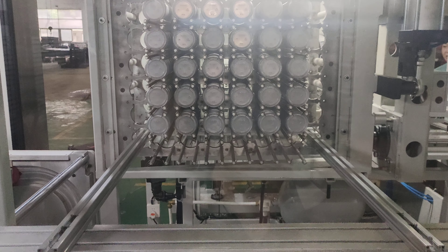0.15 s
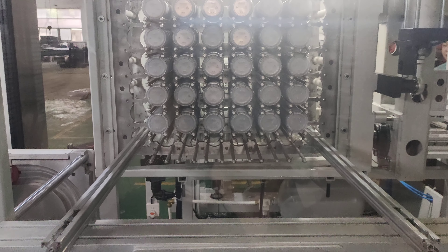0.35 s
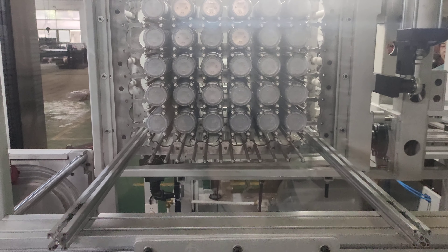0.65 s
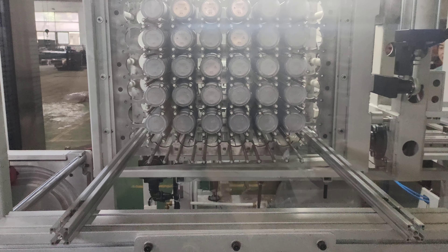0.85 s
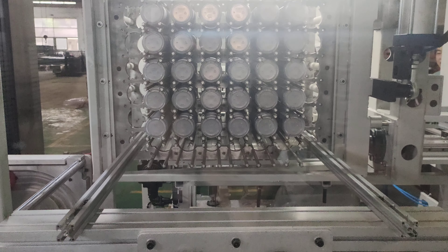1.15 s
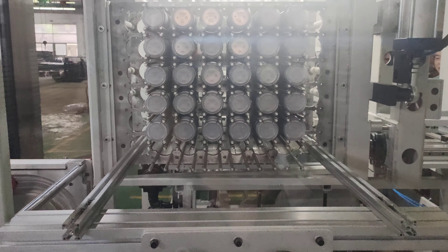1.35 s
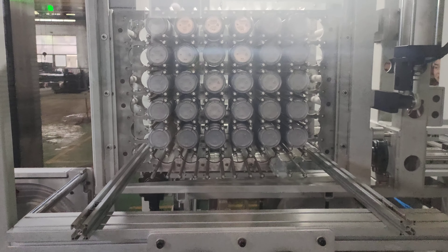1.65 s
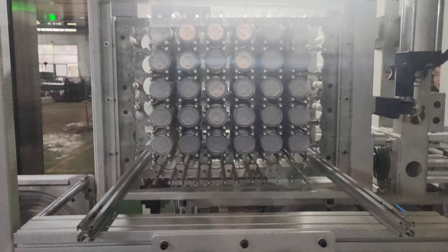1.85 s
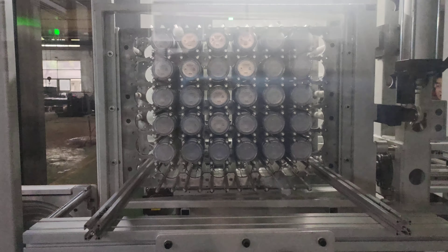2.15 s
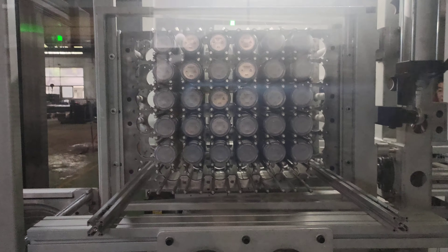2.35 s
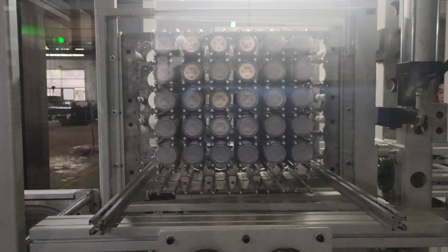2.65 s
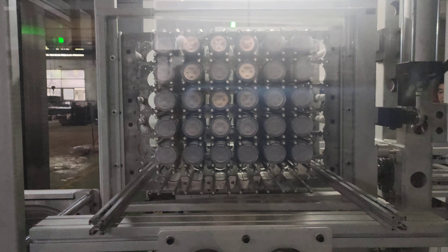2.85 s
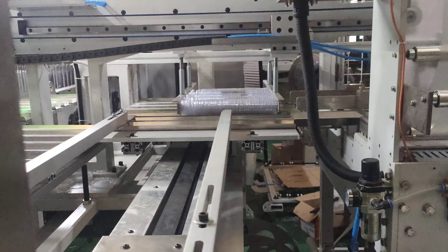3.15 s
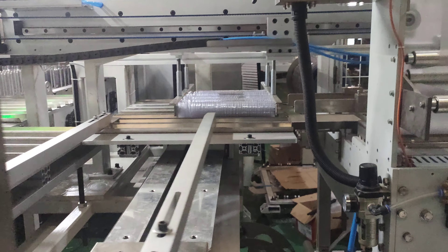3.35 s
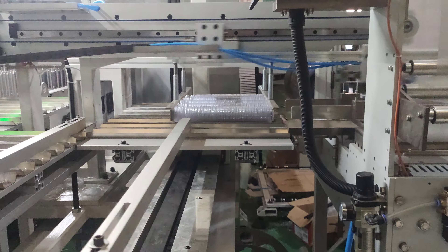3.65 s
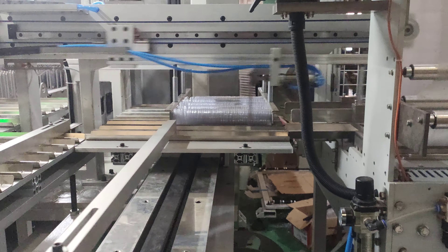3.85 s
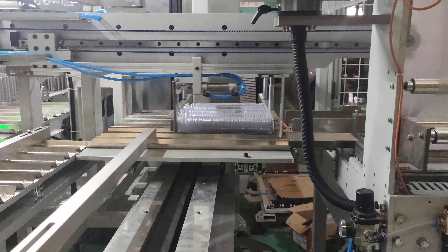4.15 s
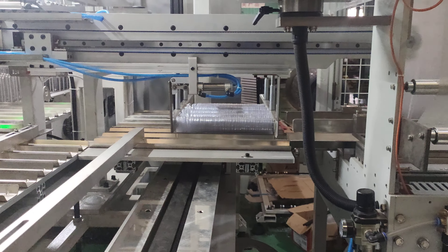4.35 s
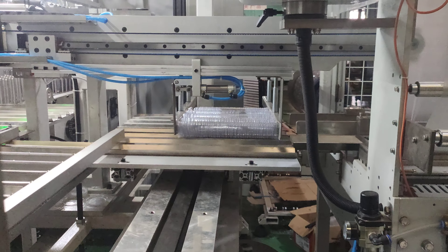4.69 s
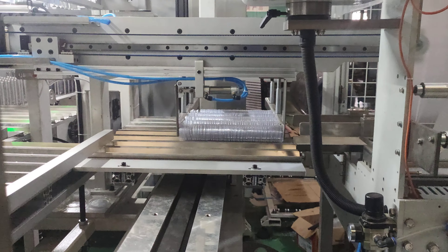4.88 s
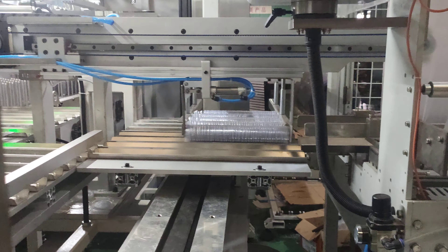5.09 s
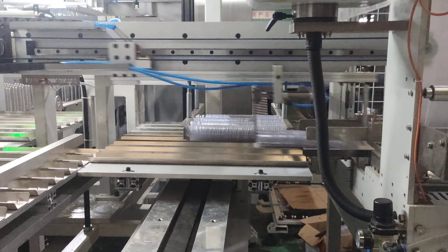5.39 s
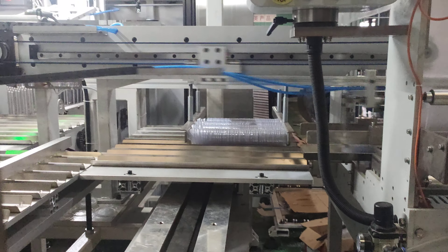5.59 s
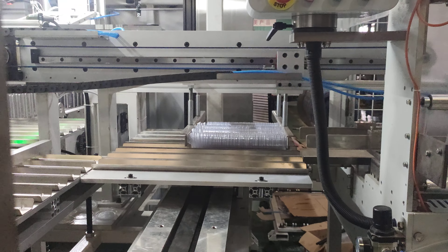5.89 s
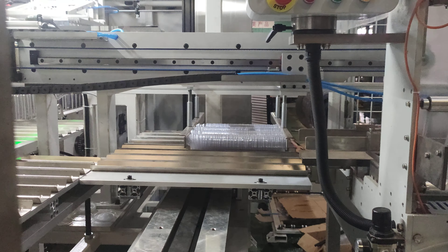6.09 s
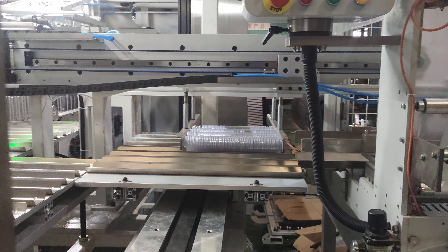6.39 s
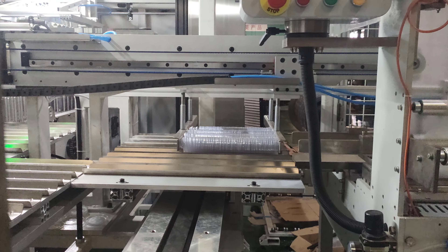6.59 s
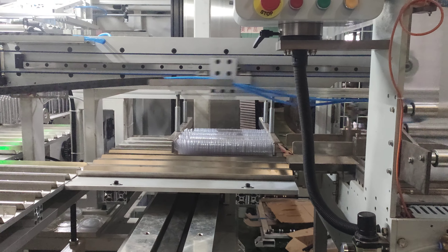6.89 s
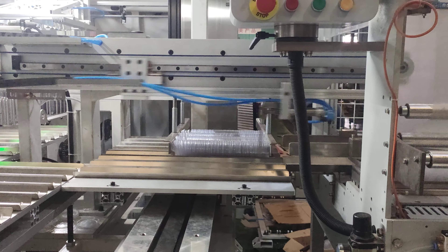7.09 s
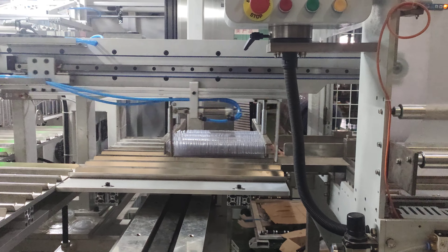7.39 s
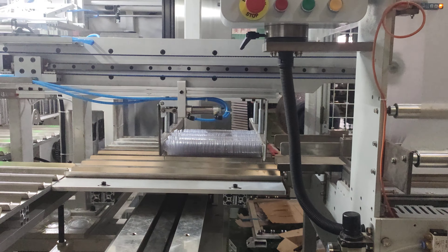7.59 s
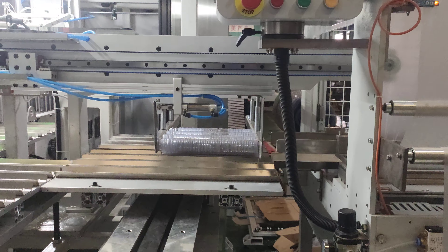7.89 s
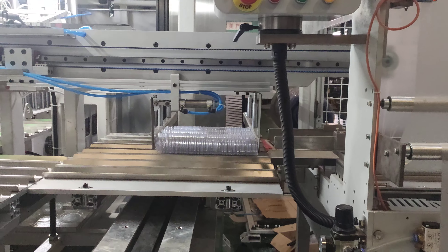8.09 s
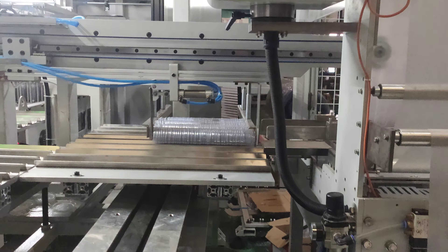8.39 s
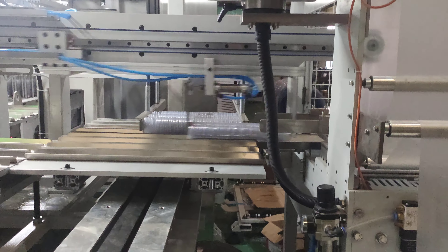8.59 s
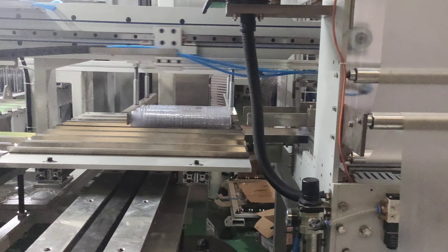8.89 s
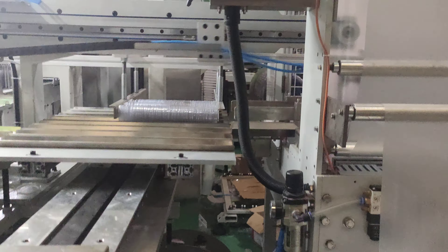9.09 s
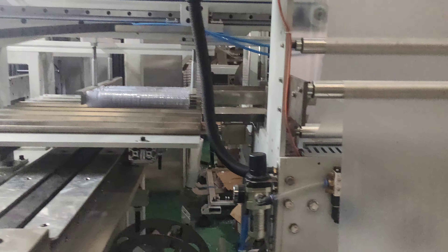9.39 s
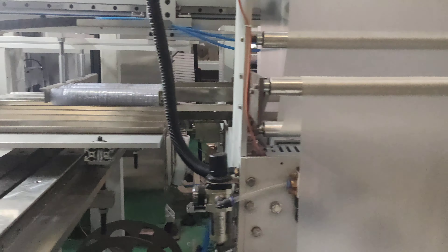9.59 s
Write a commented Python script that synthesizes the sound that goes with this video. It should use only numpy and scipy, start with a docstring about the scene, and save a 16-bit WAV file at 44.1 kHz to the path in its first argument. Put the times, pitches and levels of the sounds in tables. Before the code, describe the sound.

Factory forming and stacking machines drone, with repeated bursts of air hiss, metal clanks and rattling plastic cups, briefly cutting out.

```python
"""A forming mould drones and vents air in a factory hall, then slams shut with a blast that pops the left
microphone port. After half a second of silence this plastic thermoforming line is heard at its stacker.
The press works in a 2.2 s cycle: it vents air, slides, drops rattling cups and thumps its frame.
The stacker's carriage keeps its own 3.3 s cycle of hissing valves and slides knocking on their stops.
Underneath, the conveyor and the hall drone on."""
import sys
import numpy as np
from scipy import signal
from scipy.fft import rfft, irfft, next_fast_len
from scipy.io import wavfile
from scipy.ndimage import uniform_filter1d, map_coordinates

SR = 44100
rng = np.random.default_rng(int(sys.argv[2]) if len(sys.argv) > 2 else 0)


def wrap_up_sound(samples):
    """Save the sound to the file named by the first command line argument, as 16-bit audio."""
    columns = np.atleast_2d(samples).T
    # keep every value between -1 and 1, then stretch to whole-number steps
    tamed = np.clip(columns, -1, 1)
    steps = np.round(tamed * 32767).astype(np.int16)
    wavfile.write(sys.argv[1], SR, steps)


N = 429534
T = np.arange(N) / SR
SILENCE_START_S, SILENCE_END_S = 2.521, 3.008
POP_S, PRESSURE_RISE_S, CHOKE_ONSET_S = .0024, .0046, .014
MODE_SPREAD = .022  # share by which a body's pitches vary from blow to blow
TOP_HZ = 11700

# starts of the mould, press and carriage cycles: t/s, level/dB
CYCLES = {"mould": [(-0.624, 0), (1.557, -1.4)], "press": [(3.366, 0.4), (5.571, 0.5), (7.78, -0.6)],
          "carriage": [(3.064, 1.7), (6.363, 0.93), (9.65, 1.2)]}
# The next seven cue lists count from the start of the named cycle; "once" rows are in scene time.
# strokes of the mould's platens and sheet feed: t/s at full speed, level/dB, half length/s
PLATEN_STROKES = {"mould": [(.28, -19.5, .13), (.675, -20, 0.15), (1.08, -30, 0.11), (1.53, -34, 0.033),
                  (1.73, -18, 0.11), (2.03, -25, 0.077), (2.22, -24.5, 0.034)]}
# strokes of the slides along their rails: t/s at full speed, level/dB, half length/s
SLIDE_STROKES = {"press": [(-.005, -23, 0.026), (.25, -21, 0.17), (.64, -26, 0.13), (1.1, -35.5, .1),
                 (1.73, -25, .11)], "carriage": [(.1, -30.5, 0.18), (1.38, -27.5, 0.091),
                 (2.62, -28.5, 0.042)]}
# air venting from the mould: t/s, level/dB, open/s, pressure fall/(dB/s), t60/s after closing
VENTS = {"mould": [(.19, -16, 0.48, 18, 1.43), (1.99, -35, .03, 10, .6), (2.14, -24.5, .04, 0.5, .25),
         (2.19, -21, 0.026, 6, .25)]}
# valve exhausts: t/s, level/dB, open/s, pressure fall/(dB/s), t60/s after closing, sizzle/dB re hiss
VALVES = {"press": [(-.018, -28, 0.026, 3.5, 0.35, -3), (.003, -21, 0.23, 19, 0.46, -2.5),
          (.41, -26, .16, 21, .6, -24)], "carriage": [(-.004, -21, 0.32, 7, 0.53, -10),
          (.92, -21, 0.31, 3, 0.36, -9), (1.912, -28, 0.17, 20, .55, -19),
          (2.309, -28, 0.01, 20, 0.15, -5)], "once": [(1.626, -19, 0.012, 24, 0.39, -0.5),
          (2.031, -14.5, 0.012, 39.5, 0.3, -8), (8.98, -29, 0.19, 18, 0.71, -10)]}
# cups being pushed and stacked: t/s, level/dB, hold/s, fall/(dB/s), boom/dB re ring
CUP_PUSHES = {"press": [(.004, -19.5, 0.142, 27.5, -4.5)], "carriage": [(1.201, -18, 0.056, 41.5, -10),
              (2.785, -30.5, 0.045, 30, 0)], "once": [(3.47, -24.5, .12, 9, -2.5)]}
# slides hitting their stops: t/s, level/dB, t60/s, click/dB re clank
STOPS = {"carriage": [(.016, -26.5, .2, -9.5), (1.202, -17, 0.5, -19), (2.309, -26.5, .16, 1),
         (2.772, -17.5, 0.34, -16)], "once": [(1.584, -24.5, .1, -1), (1.606, -19.5, 0.12, 3),
         (1.728, -24, 0.2, 5.5), (3.34, -23.5, .3, -12), (4.33, -17, 0.126, -15), (5.84, -21, .2, -3),
         (6.21, -26, 0.57, -18.5), (7.625, -15.5, 0.16, -17), (7.765, -23, .25, -12),
         (8.91, -23, 0.45, -18), (9.130, -31, 0.25, 2), (9.157, -20.5, .25, -20), (9.653, -23, .1, -13)]}
# heavy strokes shaking the frame: t/s, level/dB
THUMPS = {"press": [(.11, -16.5), (.41, -17)], "once": [(2.04, -11.5), (4.3, -23.5)]}

# single hits: t/s, level/dB
CUP_CLACKS = [(1.586, -20.5), (1.641, -17), (3.381, -15.5), (3.425, -16), (3.444, -16.5), (3.487, -17.5),
              (3.527, -20.5), (4.272, -15.5), (4.302, -21), (5.577, -19), (5.595, -15), (5.634, -14),
              (5.655, -17), (5.679, -18), (7.575, -16), (7.599, -21), (7.624, -22), (7.793, -13),
              (7.838, -16), (7.862, -18.5), (7.895, -21), (7.922, -15.5), (9.180, -18)]
STEEL_CLINKS = [(1.603, -25), (1.619, -20), (1.729, -18), (1.740, -15.5), (2.039, -24)]
SPOOL_KNOCKS = [(4.975, -21), (5.378, -19), (6.379, -13.5), (8.676, -21.5), (8.985, -15), (9.668, -16)]
# squeals and groans of air and guides: t/s, half length/s, f/Hz, width/Hz, glide/(Hz/s), level/dB
SQUEALS = [(0.345, 0.016, 403, 110, 0, -23.5), (0.42, 0.026, 785, 220, -1500, -23.5),
           (1.829, 0.055, 1680, 190, 0, -19.5), (1.951, 0.09, 1690, 260, 0, -23),
           (1.901, 0.047, 2800, 600, 2500, -21.5), (1.931, 0.12, 2110, 190, 2, -27),
           (2.014, 0.022, 4910, 400, 12000, -25), (2.2, 0.2, 333, 160, 0, -31),
           (1.812, .016, 6900, 380, 0, -26.5), (1.885, .025, 5400, 300, -0.5, -26),
           (2.062, .04, 7640, 260, 0.5, -23), (5.997, 0.12, 2120, 260, 2.5, -30),
           (7.668, 0.01, 291, 60, -3, -20), (8.918, 0.008, 5460, 1110, 0, -29),
           (9.57, 0.077, 356, 130, -1, -29.5), (9.703, .04, 2750, 450, -6, -26.5)]
# air puffs on the left port: t/s, level/dB, half length/s
PUFFS = [(1.633, -15, 0.008), (1.848, -21, .012)]
# pops of the left diaphragm as the mould closes: t/s, level/dB, polarity, pressure before it/dB re pop
POPS = [(1.640, -1, 1, -1), (1.655, -1, -1, -11.5), (1.690, -2.5, -1, -12), (1.730, -4, 1, -11)]
# the overloaded left port goes deaf: t/s at its deepest, depth/dB, recovery/s
CHOKES = [(1.670, 28.5, .03), (1.739, 26, 0.055)]
# fader curve of the conveyor and hall drone at the stacker: t/s, level/dB
CONVEYOR_LEVEL = [(3, -28), (4.8, -28), (5.3, -26.5), (6.4, -28), (7, -25.5), (8.8, -28), (9.74, -25)]

# narrow resonances: f/Hz, width/Hz, level/dB
MOULD_WHINE = [(1030, 105, -35), (2150, 60, -49.5)]
DRIVE_WHIRR = [(273, 70, -35), (2096, 170, -34.5), (3135, 430, -32.5), (3476, 61, -40.5)]
CUP_RING = [(805, 100, -3.5), (955, 160, -6)]  # relative to the rattle
SILENCER_PEAKS = [(3250, 300, 2), (5040, 650, 3), (6960, 200, 4.5), (7550, 180, 4.5), (8200, 300, 4),
                  (11040, 1200, 8.5)]  # boosts on the valves' hiss
# what struck bodies ring with: f/Hz, level/dB, t60/s
CUP_MODES = [(228.5, -8.5, 0.13), (338, -5.5, 0.15), (491, -10, 0.078), (684, -8.5, 0.072),
             (829, -2.5, 0.15), (940, -3, 0.11), (1054, -7.5, 0.1), (1270, -9, .05)]
STEEL_MODES = [(1712, -5, .07), (1950, -5, .05), (2130, -3.5, .12), (2347, 1, .08), (2568, -3.5, .06),
               (3456, -13.5, .05)]
FRAME_MODES = [(82.9, -0.5, 0.24), (96, -4, 0.22), (113, -1.5, .2), (205, -10, .12)]
VALVE_BLOCK_MODES = [(327, -9.5, 0.05), (847, -6.5, 0.052), (1104, -5, 0.045), (1730, -4.5, .028)]
# noise colours: f/Hz, level/dB
MOULD_DRONE = [(25, -33), (60, -15.5), (110, -1.5), (170, -0.5), (230, 2), (320, -3), (480, -3),
               (600, -4.5), (1000, -6.5), (2000, -9), (4000, -37), (12000, -37)]
STACKER_DRONE = [(25, -51), (55, -17), (100, -3.5), (170, 0), (270, -0.5), (380, -2), (550, -4.5),
                 (900, -3.5), (2000, -14.5), (4000, -38), (12000, -70)]
SCRAPE = [(100, -17), (400, -5.5), (800, -5), (1300, 0.5), (2100, 1), (2600, -3), (3100, -11.5),
          (3900, -19.5), (6000, -17.5), (12000, -42.5)]
VENT_HISS = [(500, -30), (2000, -6), (3000, 2.5), (4000, -9.5), (5400, 0), (6800, 0), (8200, -1),
             (9600, -15), (11500, -16)]
EXHAUST_HISS = [(300, -4.5), (1000, -10), (2000, -0.5), (3200, -3.5), (4100, -6), (5200, -5), (6400, -1),
                (7500, 2), (8400, -1.5), (9800, -13.5), (11300, -14)]
JET_SIZZLE = [(4000, -18.5), (5300, 1), (7000, -5.5), (8900, 10.5), (9900, -0.5), (10700, 8.5),
              (11600, -0.5)]
CUP_RATTLE = [(300, -22), (500, -7.5), (690, -2.5), (800, -4), (950, 0), (1100, -1.5), (1300, -6),
              (2100, -11), (3800, -39), (10000, -39.5)]
STACK_BOOM = [(60, -16.5), (150, -4), (225, 0.5), (290, 0), (350, 0), (450, -5.5), (700, -24), (2000, -60)]
CLANK = [(200, -1), (500, -2), (1000, 0), (1700, -0.5), (2500, -2), (3300, -6), (4000, -16), (7000, -13),
         (12000, -39.5)]
AIR_BUFFET = [(20, -5), (60, 2.5), (130, 0), (400, -6), (1500, -20), (6000, -40), (11000, -30)]
# stereo likeness of the two ports: f/Hz, correlation (capped at 1 in use)
PORT_LIKENESS = [(80, -0.5), (150, 1.1), (350, 0.85), (800, 0.42), (1100, 0.12), (1500, -0.33),
                 (2200, 0.03), (4000, 0), (9000, 0.02)]
# tone of each port: f/Hz, level/dB
LEFT_EQ = [(80, -2), (160, 1.5), (250, 1.3), (900, 1.03), (2200, -2.5), (5000, -1), (7500, 0.5),
           (11000, -2.5)]
RIGHT_EQ = [(50, -16), (90, -22.5), (125, -21), (165, -4), (250, 0.9), (900, 1.17), (2200, 1.5),
            (5000, 2.5), (7500, 5), (11000, -1.5)]


def mould():
    """The forming station: platens rumble, scrape and spill air; vents hiss over whine and motor hum."""
    moving = motion(PLATEN_STROKES)
    drone = np.hypot(amp(-27), amp(-6) * moving) * rush(MOULD_DRONE) * rattle(rate=410, t60=.37)
    scrape = np.hypot(amp(-32), moving) * rush(SCRAPE) * rattle(rate=1300, t60=.11)
    vent_power = sum((amp(db) * burst(s, hold, fall, t60, rise=.024)) ** 2
                     for s, db, hold, fall, t60 in cues(VENTS))
    air = np.sqrt(vent_power + (amp(-12) * moving) ** 2 + amp(-41.5) ** 2) * rush(VENT_HISS)
    whine = sum(amp(db + 2.5 * wobble(6)) * tone(hz, width) for hz, width, db in MOULD_WHINE)
    return drone + scrape + air + whine + motor(hum_hz=167.4, db=-35)


def stacker():
    """The stacking station: a rumbling conveyor, air-driven slides and a drive whose whirr drops back."""
    moving = motion(SLIDE_STROKES)
    conveyor = amp(np.interp(T, *np.transpose(CONVEYOR_LEVEL)))
    drone = np.hypot(conveyor, amp(-6.5) * moving) * rush(STACKER_DRONE) * rattle(rate=450, t60=.43)
    running = np.interp(T, [6.4, 7], [1, .25])
    sliding = np.hypot(amp(-30) * np.hypot(1, amp(-1.5) * running), amp(-1.5) * moving)
    scrape = sliding * rush(SCRAPE) * rattle(rate=860, t60=.42)
    leak = amp(-5.5) * sliding * rush(EXHAUST_HISS)  # the harder the slides run, the more air they spill
    whirr = running * sum(amp(db + 1.8 * wobble(7)) * tone(hz, width) for hz, width, db in DRIVE_WHIRR)
    return drone + scrape + leak + whirr


def valves():
    """Each valve spits as it opens, then hisses while the pressure falls; its sizzle dies first."""
    out = np.zeros((2, N + SR))
    for s, db, hold, fall, t60, sizzle_db in cues(VALVES):
        spit = amp(-1) * burst(0, .012, 0, t60 / 2, rise=.01, size=SR)
        flow = np.hypot(burst(0, hold, fall, t60, rise=.0026, size=SR), spit)
        sizzle = amp(sizzle_db) * flow ** 2 * rush(JET_SIZZLE, SR)
        place(out, s, amp(db) * (flow * jet(SR, echo_db=-11.5) + sizzle))
    return out[:, :N] * amp(.6 * wobble(45)) * rattle(rate=2200, t60=.04)  # flutter and sputter


def jet(size, echo_db):
    """Hiss through a silencer; echoes off the nearest panels comb it differently for each valve."""
    lags_s = rng.uniform(.0004, .005, (3, 1))

    def gain(hz):
        boost_db = sum(db * bell(hz - centre, width / 2) for centre, width, db in SILENCER_PEAKS)
        comb = 1 + amp(echo_db) * np.cos(2 * np.pi * hz * lags_s).sum(0)
        return colour(EXHAUST_HISS, hz) * amp(boost_db) * comb
    return diffuse(gain, size)


def cups():
    """Thin cups strike one another in a quick hollow rattle, and their stack booms."""
    ring_power, boom_power = np.zeros((2, N))
    for s, db, hold, fall, boom_db in cues(CUP_PUSHES):
        push = amp(db) * burst(s, hold, fall, t60=.45, rise=.0067)
        ring_power += push ** 2
        boom_power += (push * amp(boom_db)) ** 2
    hollow = unit(rush(CUP_RATTLE) + sum(amp(db) * tone(hz, width) for hz, width, db in CUP_RING))
    boom = np.sqrt(boom_power) * rush(STACK_BOOM)
    return (np.sqrt(ring_power) * hollow + boom) * rattle(rate=380, t60=.069)


def clacks():
    """The hardest blows ring single cups."""
    return blows(CUP_CLACKS, CUP_MODES, attack_s=.0015)


def clinks():
    """Steel parts meet and ring as the mould closes and locks."""
    return blows(STEEL_CLINKS, STEEL_MODES, attack_s=.0004)


def stops():
    """A slide lands with a chattering clank and a bright click."""
    clank_power, click_power = np.zeros((2, N))
    for s, db, t60, click_db in cues(STOPS):
        blow = amp(db) * burst(s, .013, 0, t60, rise=.0057)
        clank_power += blow ** 2
        click_power += (blow * amp(click_db)) ** 2
    clank = np.sqrt(clank_power) * rush(CLANK)
    click = np.sqrt(click_power) * rush(EXHAUST_HISS)
    return (clank + click) * rattle(rate=680, t60=.033)


def thumps():
    """The frame booms after each heavy stroke."""
    return blows(cues(THUMPS), FRAME_MODES, attack_s=.018)


def knocks():
    """A spool hits the end of its travel and briefly rings the valve block."""
    out, t = np.zeros(N), T[:SR // 20]
    for s, level_db in SPOOL_KNOCKS:
        for hz, db, t60 in VALVE_BLOCK_MODES:
            place(out, s, amp(level_db + db - 60 * t / t60) * np.sin(2 * np.pi * hz * t))
    return out


def squeals():
    """Narrow resonances swell and fade, roughened by sticking and slipping; some glide in pitch."""
    out, t = np.zeros((2, N + SR)), T[:SR] - .5
    for s, half, hz, width, glide, db in SQUEALS:
        ring = signal.hilbert(tone(hz, width, size=SR)) * np.exp(1j * np.pi * glide * t ** 2)
        place(out, s, amp(db) * bell(t, half, power=4) * ring.real)
    centred = out[:, SR // 2:][:, :N]  # each swell peaks on its cue
    return centred * rattle(rate=500, t60=.035)


def puffs():
    """Blown air hits only the left port: turbulence, and pressure that builds and lets go with a pop."""
    out = sum(amp(db) * bell(T - s, half) for s, db, half in PUFFS) * rush(AIR_BUFFET)
    for s, db, polarity, pressure_db in POPS:
        age = np.abs(T - s) / POP_S
        pressure = amp(pressure_db) * np.exp(-((T - s) / PRESSURE_RISE_S) ** 2)
        out[0] += np.sign(polarity) * amp(db) * np.where(T < s, -pressure, (1 - age) * np.exp(-age))
    return out * [[1], [0]]


def choke():
    """Gain of the two ports: the blast pins the left diaphragm, which then frees itself."""
    loss_db = sum(np.interp(T, [s - CHOKE_ONSET_S, s, s + recovery], [0, depth_db, 0])
                  for s, depth_db, recovery in CHOKES)
    return amp(-loss_db * np.array([[1], [0]]))


def motor(hum_hz, db):
    """A motor's steady hum, drifting slightly in phase and strength."""
    return amp(db + 1.5 * wobble(12)) * unit(np.sin(2 * np.pi * hum_hz * T + .5 * wobble(10)))


def clatter():
    """Loose parts of the line knock lightly at random."""
    return amp(-36.5) * rattle(rate=9, t60=.11) * rush(CLANK)


def blows(hits, modes, attack_s):
    """Single blows on a body; no two ring quite alike, and the higher modes spread in stereo."""
    out, t = np.zeros((2, N + SR)), T[:SR // 2]
    hz, db, t60 = np.transpose(modes)[:, :, None]
    for s, level_db in hits:
        detune, strength, phase, skew = rng.standard_normal((4, *hz.shape))
        port_phase = np.multiply.outer([1, -1], skew * stereo_angle(hz))
        decay = amp(level_db + db + 2.1 * strength - 60 * t / t60)
        ring = decay * np.sin(2 * np.pi * (hz * (1 + MODE_SPREAD * detune) * t + phase) + port_phase)
        place(out, s, ring.sum(1) * (1 - np.exp(-t / attack_s)))
    return out[:, :N]


def cues(table):
    """A cue list's rows, repeated in every cycle they belong to, in scene time."""
    return [(start + s, db + cycle_db, *rest) for name, rows in table.items()
            for start, cycle_db in CYCLES.get(name, [(.00038, .004)])
            for s, db, *rest in rows if start + s < T[-1]]


def motion(strokes):
    """Strength of the sliding: each stroke speeds up and slows down in a bell shape."""
    return np.sqrt(sum(amp(db) ** 2 * bell(T - s, half, power=4) for s, db, half in cues(strokes)))


def burst(s, hold, fall, t60, rise, size=N):
    """Envelope that rises at s, sags by fall dB a second while held, then dies away in the hall."""
    t = np.maximum(T[:size] - s, 0)
    tail_db = 60 * np.clip(t - hold, 0, 2 * t60) / t60
    return (1 - np.exp(-t / rise)) * amp(-fall * np.minimum(t, hold) - tail_db)


def rattle(rate, t60):
    """Grainy envelope of rms 1: rate small impacts a second, of random size, each ringing briefly."""
    chance, size = rng.random((2, N))
    energy = (chance < rate / SR) * size
    return unit(np.sqrt(signal.lfilter([1], [1, -amp(-60 / t60 / SR) ** 2], energy)))


def wobble(rate):
    """A smooth random curve, rate knots a second."""
    return map_coordinates(rng.standard_normal(int(N * rate / SR) + 4), [T * rate])


def rush(spectrum, size=N):
    """Broad noise of the given colour."""
    return diffuse(lambda hz: colour(spectrum, hz), size)


def tone(centre_hz, width_hz, size=N):
    """A narrow resonance kept ringing by turbulence."""
    return diffuse(lambda hz: bell(hz - centre_hz, width_hz / 2), size)


def diffuse(gain, size):
    """Stereo noise of rms 1, shaped by gain(hz): centred in the upper bass, wide in the treble."""
    m = next_fast_len(size, True)
    hz = np.fft.rfftfreq(m, 1 / SR)
    angle = stereo_angle(hz)
    spectra = rfft(rng.standard_normal((2, m))) * gain(hz)
    mid, side = irfft(spectra * [np.cos(angle), np.sin(angle)], m)[:, :size]
    return unit(np.array([mid + side, mid - side]))


def stereo_angle(hz):
    """Mid/side angle in radians that gives the ports their likeness."""
    return np.arccos(np.clip(along(PORT_LIKENESS, hz), -1, 1)) / 2


def colour(spectrum, hz):
    """Gain of a noise colour, rolled off below its first point."""
    return amp(along(spectrum, hz)) * np.minimum(hz / spectrum[0][0], 1) ** 2


def along(points, hz):
    """Points (f/Hz, value) read on a log axis."""
    f, values = np.transpose(points)
    return np.interp(np.log(hz + 1), np.log(f), values)


def bell(offset, half, power=2):
    """A hump of height 1, down to one half at an offset of half."""
    return 1 / (1 + np.abs(offset / half) ** power)


def place(track, s, sound):
    """Mix a sound into a track at s seconds."""
    track[..., round(s * SR):][..., :sound.shape[-1]] += sound


def amp(db):
    """Decibels to gain."""
    return 10 ** (np.asarray(db) / 20)


def unit(x):
    """Scaled to rms 1."""
    return x / np.sqrt(np.mean(x ** 2) + 1e-20)


def scene():
    """Each station is heard in turn, with the strokes of the machine on top."""
    station = np.where(T < (SILENCE_START_S + SILENCE_END_S) / 2, mould(), stacker())
    struck = clacks() + clinks()
    machine = station + clatter() + valves() + knocks() + cups() + struck + stops() + thumps() + squeals()
    return machine * choke() + puffs()


def record(dry):
    """Each port gets its tone, peaks are rounded, the sound stops between stations, the top is cut."""
    m = next_fast_len(N + SR // 2, True)
    hz = np.fft.rfftfreq(m, 1 / SR)
    toned = irfft(rfft(dry, m) * amp([along(LEFT_EQ, hz), along(RIGHT_EQ, hz)]), m)[:, :N]
    rounded = toned / (1 + (toned / .8) ** 6) ** (1 / 6)
    gate = uniform_filter1d(1.0 * ((T < SILENCE_START_S) | (T > SILENCE_END_S)), size=64)
    high_cut = 1 / (1 + (hz / TOP_HZ) ** 200)
    return irfft(rfft(rounded * gate, m) * high_cut, m)[:, :N]


dry = scene()
out = record(dry)
wrap_up_sound(out)
```